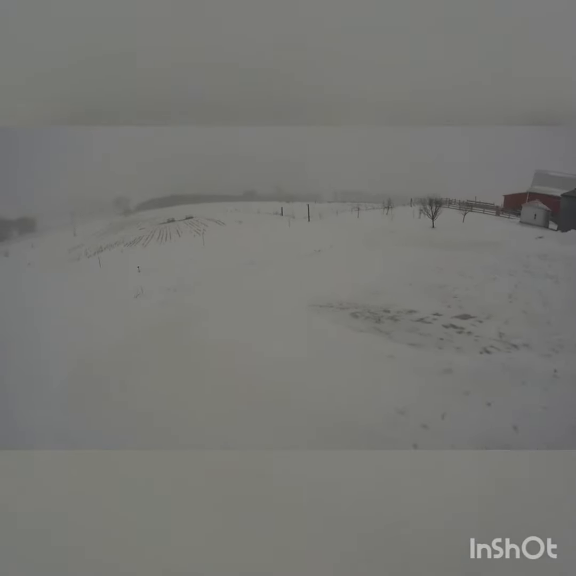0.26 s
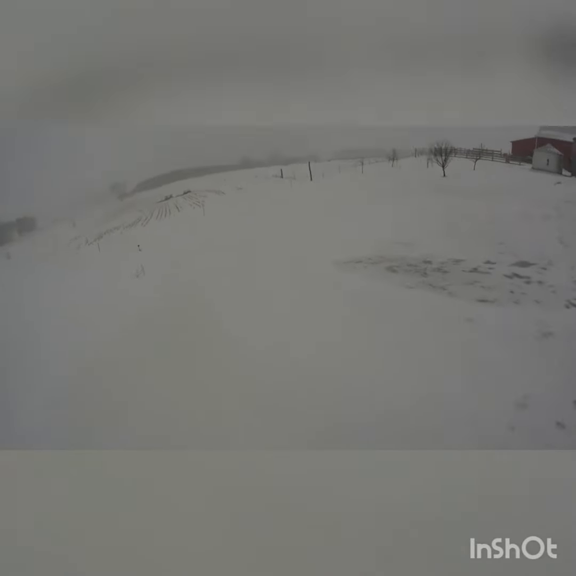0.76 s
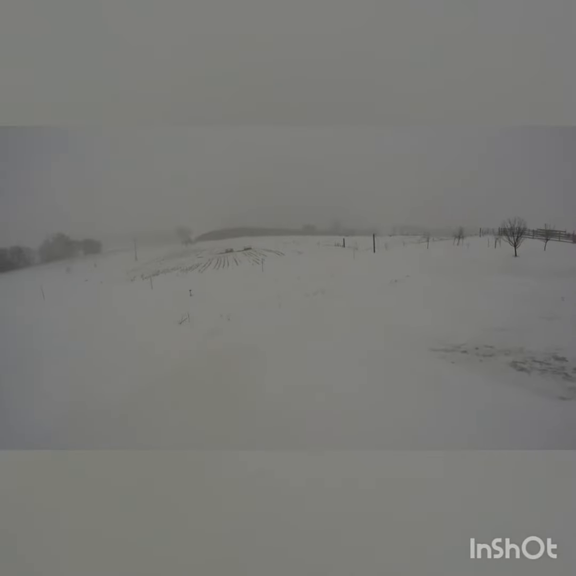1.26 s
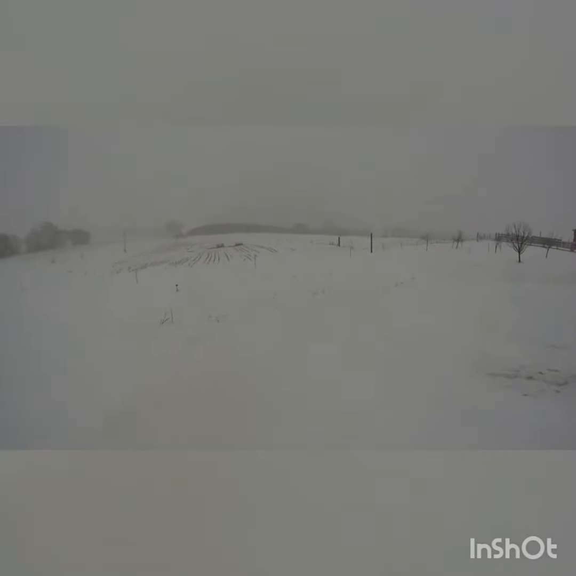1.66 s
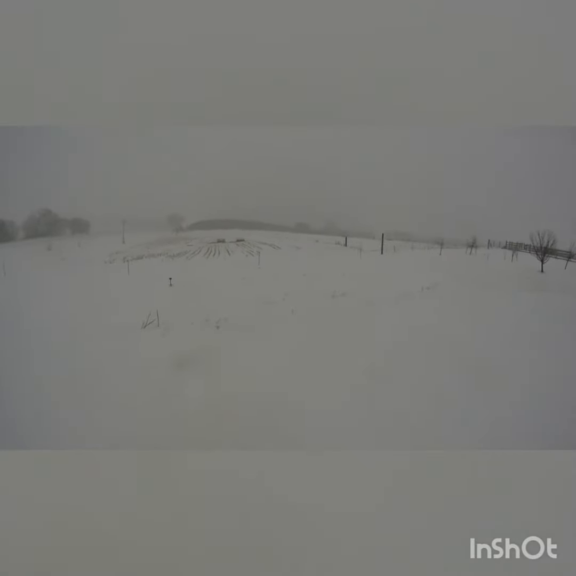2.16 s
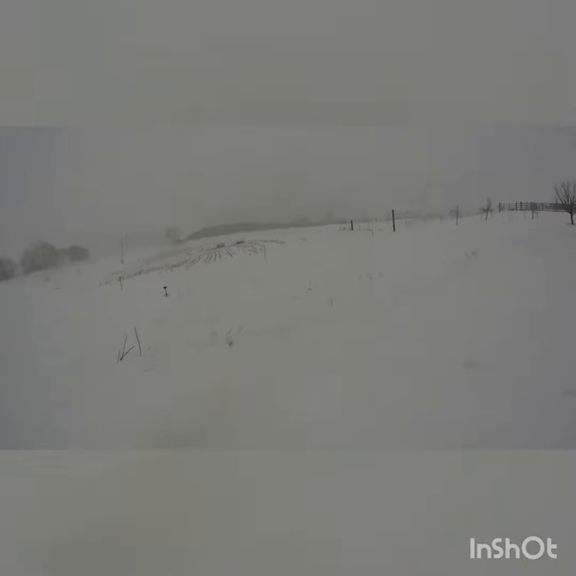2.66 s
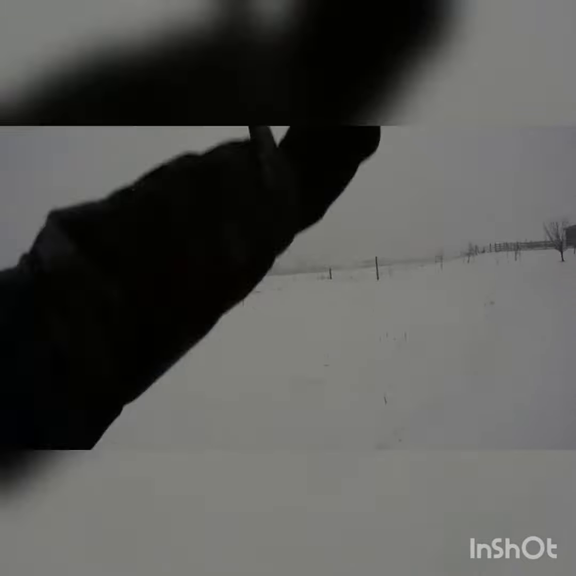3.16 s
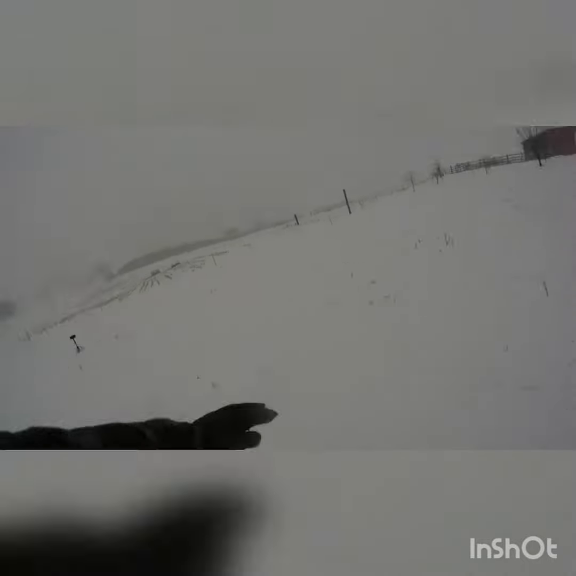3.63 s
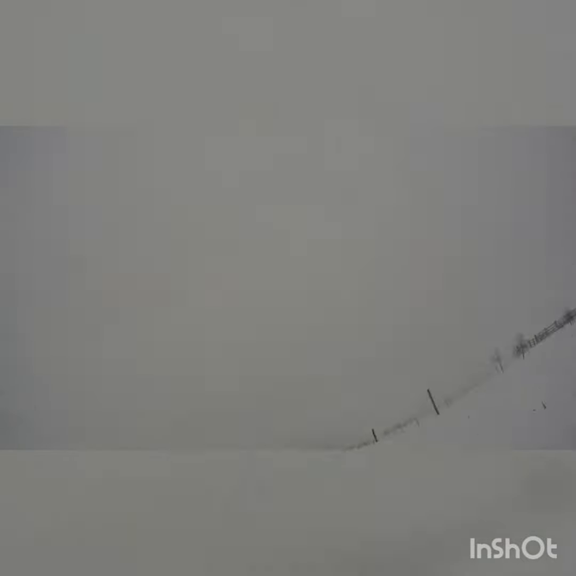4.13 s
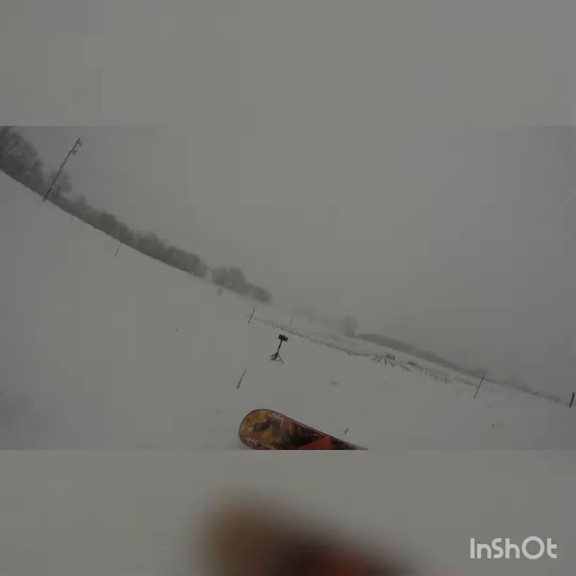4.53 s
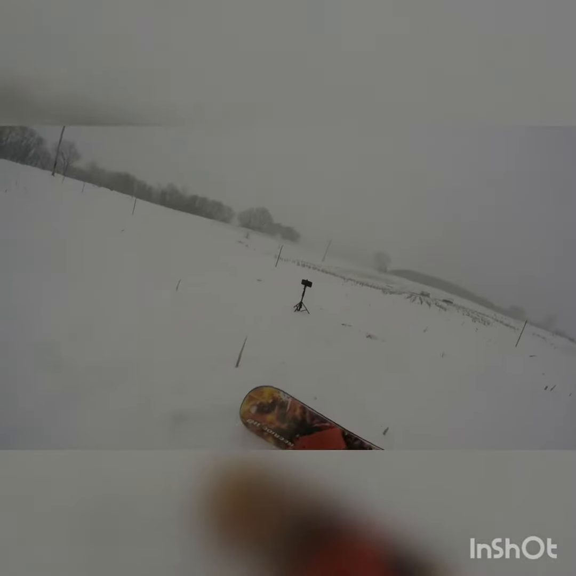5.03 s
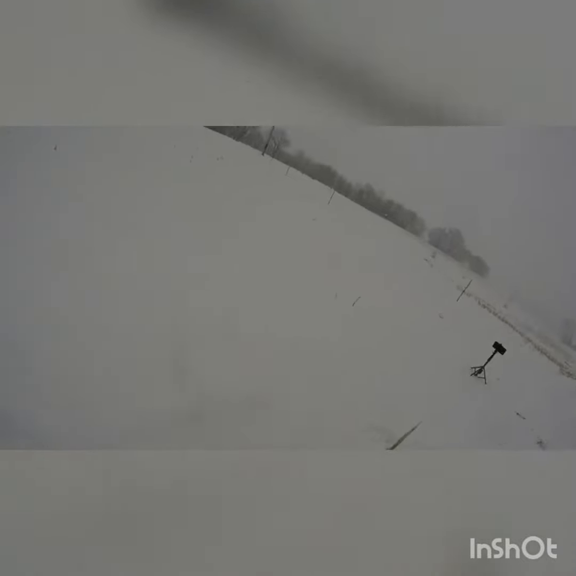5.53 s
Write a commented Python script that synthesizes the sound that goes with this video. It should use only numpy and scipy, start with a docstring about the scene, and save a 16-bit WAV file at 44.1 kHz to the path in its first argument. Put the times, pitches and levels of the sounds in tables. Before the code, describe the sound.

Outdoors on a snowy slope, a body-worn microphone in a plastic case picks up boxy, rough scraping and fine icy spray, briefly singing in thin bands. Lumpy low wind builds midway. Sharp plastic knocks come in a cluster, followed by two heavy low thumps half a second apart. The edge sings faintly twice more, then wind and scraping die down, leaving quiet breathy whistling.

```python
"""A snowboard slides over crusty snow, heard by a small camera in a closed housing on the rider.
From the start, noise shaped by the housing scrapes and crackles, and now and then a thin band sings.
From about 2 s low, uneven wind noise swells; from 3 s short rings and pressure drops click in the mount.
Near 3.8 and 4.3 s two jolts add deep, fast-fading swings and dull thuds of the board.
The edge sings twice more; then wind and slide fade and a narrow band of noise whistles softly."""
import sys
import numpy as np
from scipy import signal
from scipy.fft import rfft, irfft, next_fast_len
from scipy.io import wavfile
from scipy.ndimage import map_coordinates

SR = 44100
rng = np.random.default_rng(int(sys.argv[2]) if len(sys.argv) > 2 else 0)


def dump_mix(stems):
    """Bounce the given channels to the path in sys.argv[1] as a 16-bit WAV at rate SR."""
    frames = np.atleast_2d(stems).T  # one column per channel
    limited = np.clip(frames, -1, 1)  # hard clip at full scale
    pcm = np.round(limited * 32767).astype(np.int16)
    wavfile.write(sys.argv[1], SR, pcm)


N = 255339  # samples, about 5.8 s

# How the board slides: t/s, grind level/dB, sharpness/dB, hollowness/dB, spray level/dB
SLIDE_PATH = [(0, -50.5, 1.5, -2, -61), (.2, -48, 0.5, -1.5, -59.5), (.36, -54.5, 5, 5.5, -65),
              (.6, -44.5, -2, -5.5, -62.5), (.74, -42.5, -0.5, -0.5, -52.5), (.8, -35, -5.5, -6, -54),
              (.97, -41.5, 0.5, 0, -56.5), (1.09, -41, -3.5, -1, -56.5), (1.15, -46, 0, -2, -59.5),
              (1.28, -49, 0.5, 0, -62.5), (1.33, -41, 0.5, 0, -56.5), (1.55, -45, 0.5, 0.5, -55.5),
              (1.9, -39.5, 1, -0.5, -53.5), (2.1, -42, 5.5, 5.5, -53), (2.34, -42.5, 3.5, 1, -58),
              (2.45, -36.5, 2.5, -2, -53), (2.6, -38, -1.5, -0.5, -51.5), (2.72, -39.5, -1.5, -2, -52.5),
              (2.88, -40, 1, -2.5, -49), (3.1, -47, 4, 3, -56), (3.24, -36.5, -2, -8, -54),
              (3.34, -49.5, 0.5, 3, -52.5), (3.42, -46.5, 2.5, 2.5, -65), (3.5, -44, 1, 3, -53.5),
              (3.7, -39, 0, -0.5, -51.5), (3.88, -41, 1.5, 8.5, -52.5), (4.06, -40.5, 0.5, -1, -51.5),
              (4.15, -45, 0, 0, -51), (4.26, -42, -1, 2, -50), (4.4, -47.5, -1.5, 0, -61.5),
              (4.6, -46, 2.5, 5, -57.5), (4.8, -46.5, 0, 0, -55), (5.03, -43, -1, -2, -54),
              (5.2, -52.5, 0, 5, -58.5), (5.5, -53, 2, 0, -67), (5.79, -49, 0, -8, -62.5)]
# Crust breaking: t/s, peak level/dB
CRUST_BREAKS = [(0.362, -32), (0.407, -29), (0.7642, -23.5), (0.7896, -33), (0.8133, -36), (1.916, -32),
                (2.246, -29), (2.307, -28), (2.3705, -27), (2.73, -30), (2.9407, -28.5), (3.046, -29),
                (3.535, -27), (3.8764, -32), (4.2118, -26), (4.2561, -19.5), (4.383, -32), (4.593, -26.5),
                (4.808, -30.5), (5.1277, -31.5), (5.274, -30), (5.3428, -33.5), (5.453, -35)]
# The loudest ice crystals hitting: t/s, peak level/dB
CRYSTAL_HITS = [(0.2214, -34.5), (0.26, -31), (0.362, -27), (0.4055, -28), (0.5065, -38), (0.7806, -31.5),
                (0.9577, -32.5), (0.9686, -26.5), (1.2805, -40), (1.6047, -26.5), (1.6551, -33),
                (1.944, -28.5), (2.0298, -31.5), (2.1034, -30), (2.2246, -38), (2.2543, -27.5), (2.38, -28),
                (2.4264, -34), (2.6571, -28), (2.7806, -35), (2.8345, -34), (3.0488, -29.5),
                (3.1388, -31.5), (3.2211, -26.5), (3.47, -29), (3.5399, -22.5), (3.6166, -32),
                (3.6464, -27), (4.23, -28.5), (4.509, -36), (4.594, -26.5), (4.6588, -33), (4.8035, -37),
                (4.8419, -32), (4.9, -37), (5.129, -38), (5.272, -39.5), (5.3443, -32.5), (5.414, -39)]


def slide():
    """The base grinds snow grains; loose crystals tick in a sparser, brighter spray."""
    grind_db, sharpness_db, hollowness_db, spray_db = curves(SLIDE_PATH)
    chatter = wobble(20)  # the edge grips and lets go, in both layers at once

    grind = 0.64 * rng.standard_normal(N) + grains(count=1800, spread_db=4.0, life=0.0019)
    grind = amp(0.74 * chatter) * filtered(grind, housing)
    grind = split(grind, hz=4470)[0]
    dull, sharp = split(grind, hz=2430)
    hollow, dull = split(dull, hz=1718)
    deep, hollow = split(hollow, hz=1103)
    # The lowest colour follows 0.6 of the grind's rise and fall; grind_db is added below.
    deep_db = -15 + (0.6 - 1) * (grind_db - grind_db.mean())
    colours = [
        (deep, deep_db),
        (hollow, -9 + hollowness_db),
        (dull, -8.5 - sharpness_db),
        (sharp, -6.5 + sharpness_db),
    ]
    scrape = np.zeros(N)
    for part, colour_db in colours:
        drift_db = 1.32 * wobble(10)  # each colour drifts on its own
        scrape += amp(grind_db + colour_db + drift_db) * unit(part)

    hail = grains(count=300, spread_db=4.0, life=0.0009)  # sounds over the whole treble
    coarse = hail + 1.22 * rng.standard_normal(N)
    coarse += 1.7 * grains(count=400, spread_db=10.5, life=0.001)
    fine = hail + 0.57 * rng.standard_normal(N)
    fine += 1.1 * grains(count=400, spread_db=1.0, life=0.00069)
    hiss = split(amp(1.3 * chatter) * filtered(coarse, icy), hz=9600)[0]
    fizz = split(filtered(fine, icy), hz=9200)[1]
    fizz_db = spray_db - 8 + 3 * wobble(30)  # in flurries
    spray = amp(spray_db) * unit(hiss) + amp(fizz_db) * unit(fizz)

    scrape += bursts(CRUST_BREAKS, 0.0046 / 3, housing)
    spray += bursts(CRYSTAL_HITS, 0.002 / 3, icy)
    return scrape, spray


# The edge digs in and sings: t/s, half length/s, f/Hz, level/dB
EDGE_SONGS = [(0.834, 0.082, 2020, -46.5), (1.095, 0.019, 2000, -47), (4.55, 0.12, 2990, -46.5),
              (5.02, 0.055, 2000, -50)]


def carve():
    """Thin bands of coarse scrape that swell and fade as the edge digs in."""
    t = np.arange(N) / SR
    rasp = grains(count=1200, spread_db=2.5, life=0.004)
    out = np.zeros(N)
    for start, half_s, hz, db in EDGE_SONGS:  # start is the middle of the swell
        mode = [(hz, 350, 0)]  # 350 Hz wide, passed twice
        band = unit(filtered(rasp, lambda f: resonances(mode, f) ** 2))
        out += amp(db) * np.exp(-((t - start) / half_s) ** 4) * band
    return out


# The mount slips: t/s, ring peak level/dB, pressure drop level/dB before its shape, drop time/s
MOUNT_SLIPS = [(2.992, -24, -24, .0003), (3.0776, -9, -17, .0002), (3.2225, -23, -45, .0003),
               (3.238, -11, -20, .0002), (3.283, -45, -22, .001), (3.3, -10, -15, .0002),
               (3.338, -45, -22, .001), (3.406, -40, -24, .001), (3.7825, -19, -3, .0018),
               (4.2605, -36, -8, .0015), (4.2665, -27, .5, .0035), (4.2893, -9, -26, .0003),
               (4.293, -40, -7, .004)]
# The mount's own ring: f/Hz, width/Hz, level/dB
MOUNT_RING = [(1500, 200, -2), (2120, 330, 1), (3280, 400, -4), (4150, 400, -9)]
# Jolts: t/s, starting f/Hz, level/dB before rise and fade, rise time/s, time to fall 60 dB/s
CAMERA_JOLTS = [(3.758, 28, 2, .008, .12), (4.2535, 34, -2, .004, .36)]


def mount():
    """A slip drops the pressure quickly and rings the housing; a jolt swings the camera on its strap."""
    out, t = np.zeros(N + SR), np.arange(SR // 2) / SR
    f = np.fft.rfftfreq(len(t), 1 / SR)
    # plastic on plastic: little treble
    x = f / 4600
    soft = 0.2 * housing(f) / (1 + 1j * x)
    soft = soft + resonances(MOUNT_RING, f) / (1 + 1j * x - x ** 2)
    for s, ring_db, drop_db, drop_s in MOUNT_SLIPS:
        rattle = 0.09 * amp(-60 * t / 0.012) * rng.standard_normal(len(t))
        knock = t == 0  # a single sample
        ring = irfft(rfft(knock + rattle) * soft, len(t))
        drop = np.exp(-t / 0.006) * (1 - np.exp(-(t / drop_s) ** 2))
        here = out[round(s * SR):][:len(t)]
        here += amp(ring_db) * ring / np.abs(ring).max()
        here -= amp(drop_db) * drop
    for s, hz, db, rise_s, t60_s in CAMERA_JOLTS:
        cycles = hz * t * (1 + 2.8 * t)  # the swing quickens as it shrinks
        swell = (1 - np.exp(-t / rise_s)) ** 2
        stop = np.exp(-(t / 0.115) ** 8)  # the strap stops the swing after about 0.115 s
        swing = swell * stop * np.sin(2 * np.pi * cycles)
        out[round(s * SR):][:len(t)] += amp(db - 60 * t / t60_s) * swing
    return out[:N]


# Thuds of the board under the jolts: t/s, peak level/dB
BOARD_THUDS = [(3.762, -26.5), (3.783, -23.5), (4.258, -20.5), (4.288, -19)]
# The board's own resonances: f/Hz, width/Hz, level/dB
BOARD_BODY = [(105, 91, 7.5), (330, 450, -8.5)]


def board():
    """The jolts also sound through the board's resonances, dull and short."""
    return bursts(BOARD_THUDS, 0.004, lambda f: resonances(BOARD_BODY, f))


# How the wind blows: t/s, buffet level/dB, rumble level/dB
WIND_PATH = [(0, -40, -58.5), (.22, -44.5, -57), (.31, -35, -55), (.57, -40, -54), (.7, -54, -53.5),
             (.77, -34.5, -54), (.86, -45, -45), (.89, -31, -48.5), (1.14, -39.5, -49.5), (1.24, -45, -51),
             (1.29, -40, -51), (1.84, -45.5, -50), (2.2, -27.5, -47.5), (2.46, -35.5, -50),
             (2.72, -48.5, -50.5), (2.88, -26.5, -45.5), (2.94, -41, -43.5), (3.05, -25, -48),
             (3.19, -33.5, -44.5), (3.31, -25.5, -51), (3.39, -35.5, -44.5), (3.48, -16, -44),
             (3.6, -36, -48), (3.73, -20.5, -45.5), (3.83, -21.5, -37), (3.9, -26, -37), (3.98, -21, -42.5),
             (4.18, -33.5, -50), (4.37, -25, -47), (4.48, -24, -54.5), (4.58, -32, -59), (4.63, -15.5, -59),
             (4.69, -34, -55.5), (4.93, -26, -56), (5.07, -49, -59.5), (5.65, -40.5, -59), (5.79, -52, -65)]
# Colour of the slow buffets: f/Hz, level/dB
BUFFET_COLOUR = [(8.8, -80), (15, 10), (27, 4), (43, -0.5), (56, -0.5), (87, -22), (130, -38.5), (170, -33),
                 (290, -120)]
# Colour of the rougher rumble: f/Hz, level/dB
RUMBLE_COLOUR = [(53, -37), (90, 0), (167, -8), (287, -8), (426, -15.5), (512, -20.5), (600, -21),
                 (780, -22), (1320, -120)]


def wind():
    """Slow pressure lumps on the microphone with a rougher rumble above, both wavering by chance."""
    buffet_db, rumble_db = curves(WIND_PATH)
    eddy = wobble(14)  # one eddy shakes both layers
    lumps = amp(0.58 * eddy + 1.46 * wobble(12))
    pressure = filtered(rng.standard_normal(N), lambda f: amp(along(BUFFET_COLOUR, f)))
    buffet = unit(lumps * pressure)
    rough = amp(1.6 * eddy + 1.6 * wobble(30)) * rng.standard_normal(N)
    rumble = unit(filtered(rough, lambda f: amp(along(RUMBLE_COLOUR, f))))
    low, roar = split(rumble, hz=210)
    low = amp(0.94 * wobble(11)) * low
    roar = amp(-1 + 0.5 * wobble(7.3)) * roar
    return amp(buffet_db) * buffet + amp(rumble_db) * (low + roar)


# Wind across the port: t/s, level/dB
PORT_WHISTLE = [(0, -64), (5.25, -72), (5.5, -58), (5.79, -57)]


def whistle():
    """A thin band of wind noise at the port's own resonance, bare once the slide fades."""
    hz, width, _ = HOUSING_MODES[1]
    band = filtered(rng.standard_normal(N), lambda f: 1 / (1 + ((f - hz) / (width / 2)) ** 2))
    return amp(curves(PORT_WHISTLE)[0]) * unit(band)


# Resonances of the housing: f/Hz, width/Hz, level/dB
HOUSING_MODES = [(694, 2260, -14.5), (1494, 190, 0), (2047, 336, 0.5), (3233, 712, -1.5), (4083, 746, -8),
                 (6090, 1530, -17), (7980, 1010, -18.5), (11620, 8000, -27), (14560, 7600, -28.5)]


def housing(f):
    """The air and plastic around the microphone resonate."""
    return resonances(HOUSING_MODES, f)


# Colour of a crystal's tick: f/Hz, level/dB
ICE_COLOUR = [(2500, -116), (4300, -0.5), (5000, 2.5), (6000, 10.5), (9000, 13.5), (13000, 16.5),
              (15200, 11.5), (16300, -24)]


def icy(f):
    """A bright tick as it comes through the housing."""
    return housing(f) * amp(along(ICE_COLOUR, f))


def resonances(modes, f):
    """The causal response of several resonances, added with alternating sign."""
    total = 0
    for k, (centre, width, db) in enumerate(modes):
        damping = 1j * f * width
        total = total + (-1) ** k * amp(db) * damping / (centre * centre - f * f + damping)
    return total


def grains(count, spread_db, life):
    """Noise under a swarm of short random bursts of log-normal size; life is in seconds."""
    when, size = rng.random(count), rng.standard_normal(count)
    energy = amp(spread_db * np.clip(size, -2, 2)) ** 2
    starts = np.bincount((when * N).astype(int), energy, N)
    power = signal.fftconvolve(starts, np.exp(-np.arange(600) / (life * SR)))[:N]
    return unit(np.sqrt(np.abs(power)) * rng.standard_normal(N))


def bursts(rows, rise_s, response):
    """Short puffs of noise with a quick rise and a fade, each filtered and scaled to its peak."""
    out, t = np.zeros(N + SR), np.arange(1024) / SR
    gain = response(np.fft.rfftfreq(2048, 1 / SR))
    u = t / rise_s
    for s, db in rows:
        noise = u * np.exp(-u) * rng.standard_normal(len(t))
        puff = irfft(rfft(noise, 2048) * gain)[:len(t)]
        out[round(s * SR):][:len(t)] += amp(db) * puff / np.abs(puff).max()
    return out[:N]


def amp(db):
    """Turn dB into a plain factor."""
    return 10 ** (np.asarray(db) / 20)


def unit(x):
    """Scale x to an average (RMS) level of 1."""
    return x / np.sqrt(np.mean(x ** 2) + 1e-20)


def along(points, hz):
    """Read a (f/Hz, value) curve on a log frequency axis."""
    f, v = np.transpose(points)
    return np.interp(np.log(hz + 1), np.log(f + 1), v)


def curves(rows):
    """One value per sample for each column after the time."""
    s, *cols = np.transpose(rows)
    return [np.interp(np.arange(N) / SR, s, c) for c in cols]


def wobble(rate):
    """A smooth random curve with rate random points a second."""
    knots = rng.standard_normal(int(N * rate / SR) + 4)
    return map_coordinates(knots, [np.arange(N) * rate / SR])


def filtered(x, response):
    """Shape x by a response that depends on frequency."""
    m = next_fast_len(N + SR // 2)
    return irfft(rfft(x, m) * response(np.fft.rfftfreq(m, 1 / SR)), m)[..., :N]


def split(x, hz):
    """The parts of x below and above a soft border."""
    low = filtered(x, lambda f: 1 / (1 + (f / hz) ** 8))
    return low, x - low


def scene():
    """All layers together; in random spells the treble wavers between the two channels."""
    scrape, spray = slide()
    spells = wobble(12) > 0
    waver = 0.4 * spells * wobble(400) * spray
    both = wind() + whistle() + carve() + scrape + spray + mount() + board()
    return both + np.array([waver, -waver])


def record(dry):
    """The camera keeps nothing from its band limit of 16300 Hz upward."""
    return filtered(dry, lambda hz: hz < 16300)


dry = scene()
out = record(dry)
dump_mix(out)
```